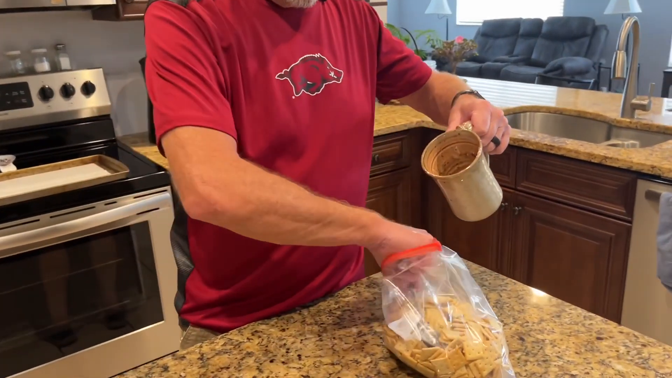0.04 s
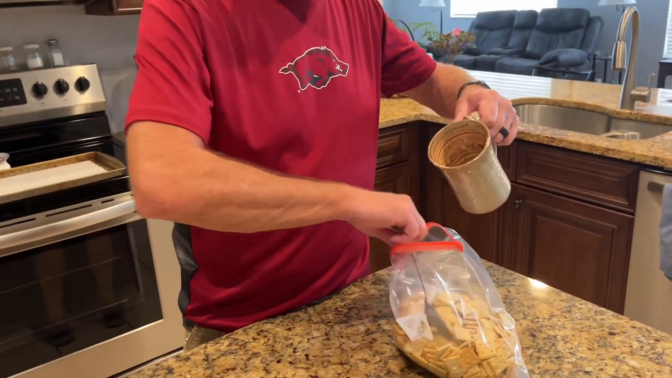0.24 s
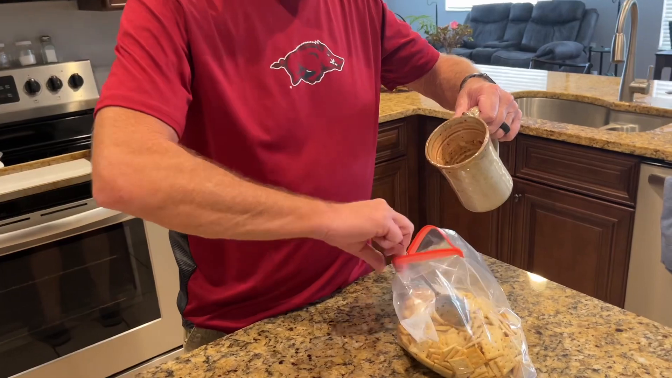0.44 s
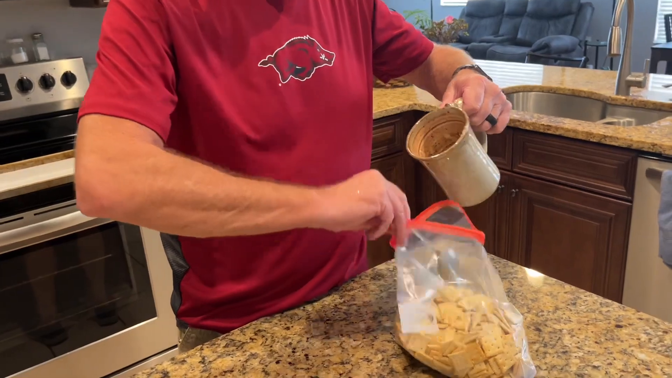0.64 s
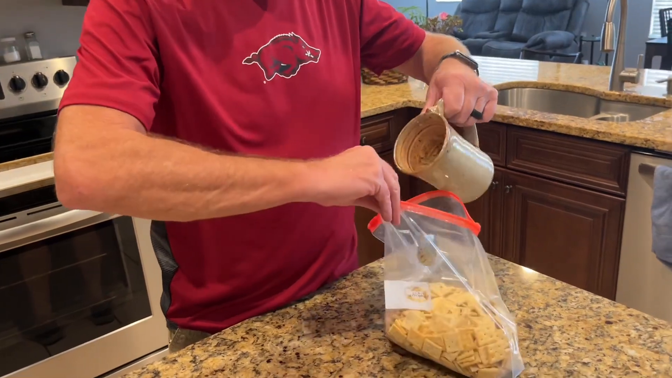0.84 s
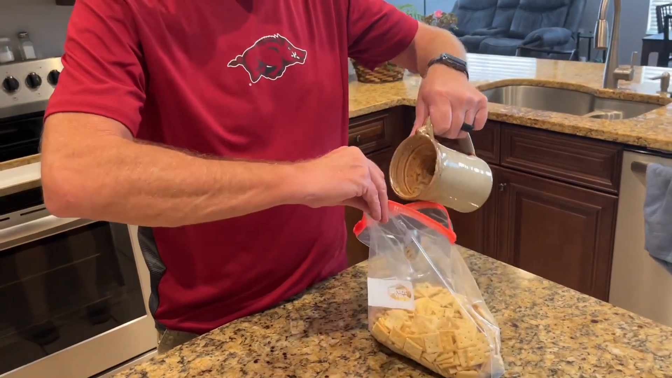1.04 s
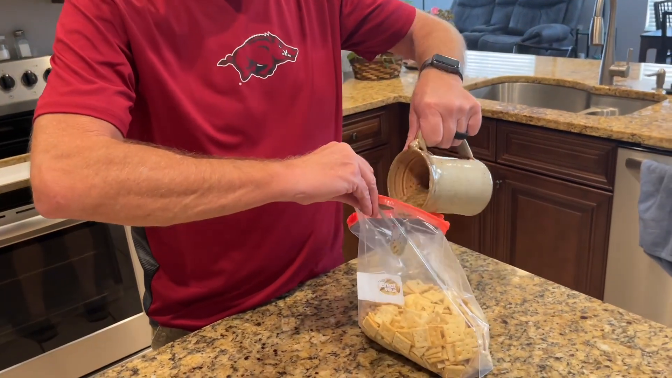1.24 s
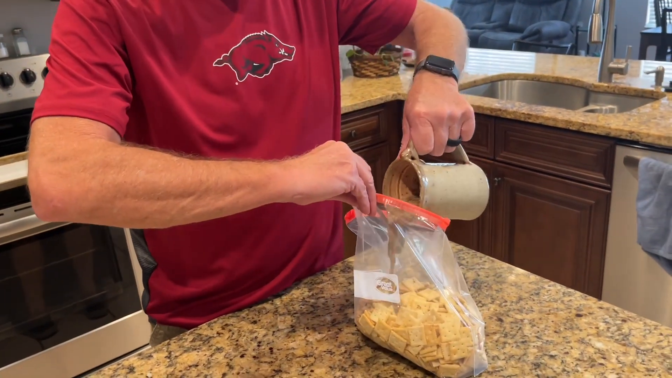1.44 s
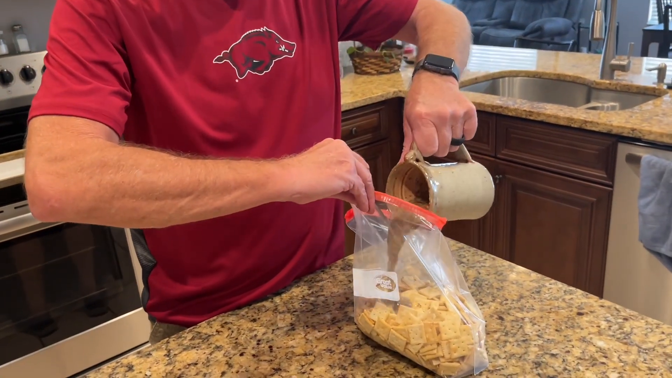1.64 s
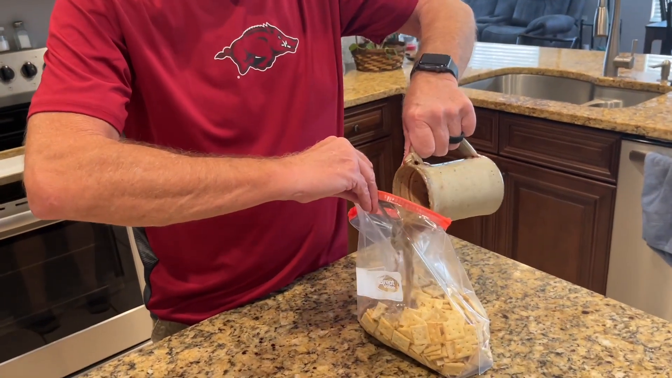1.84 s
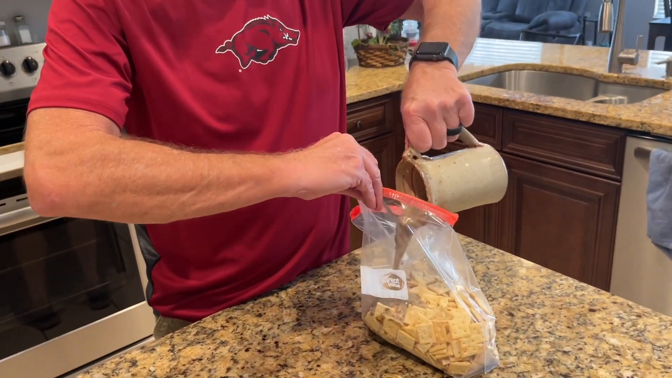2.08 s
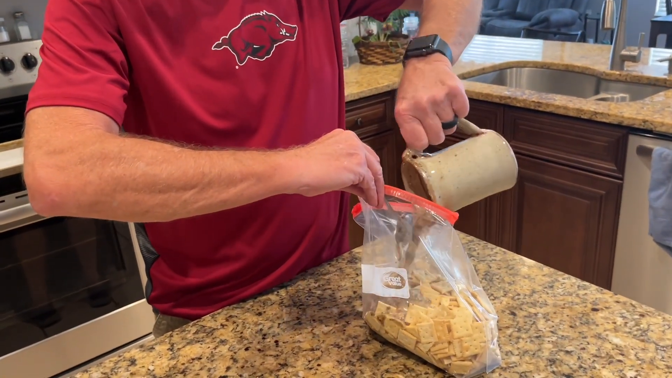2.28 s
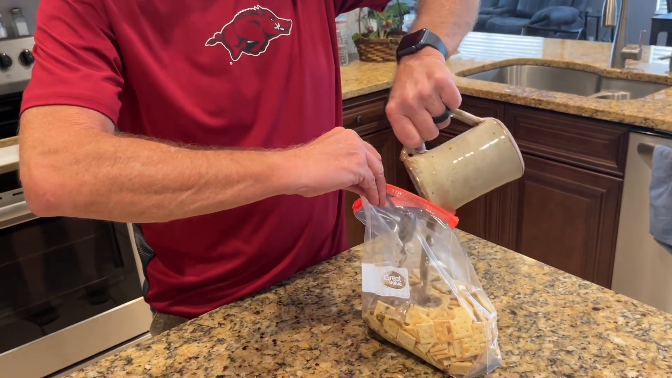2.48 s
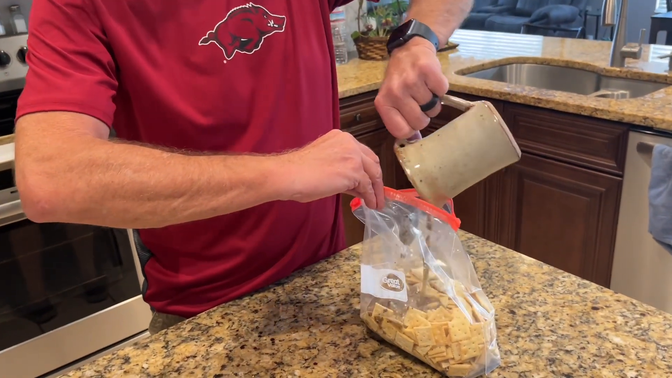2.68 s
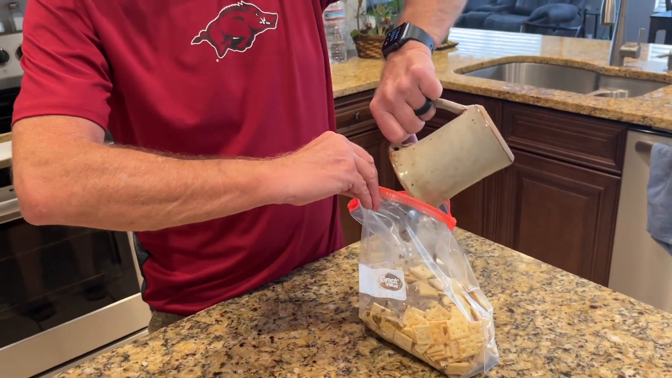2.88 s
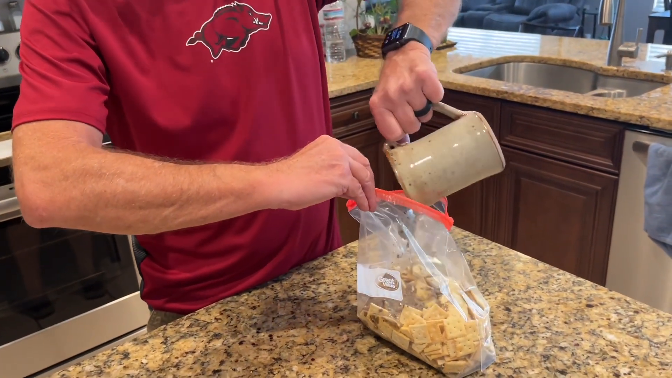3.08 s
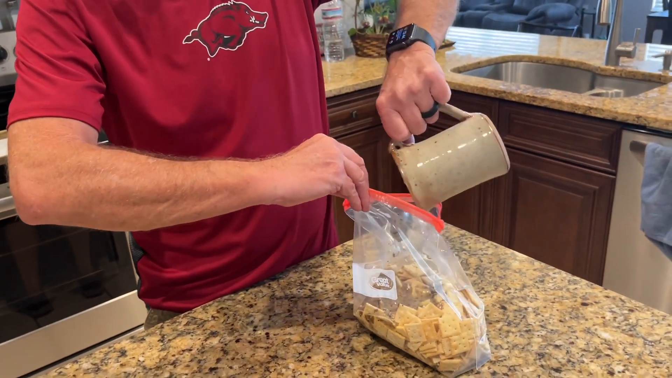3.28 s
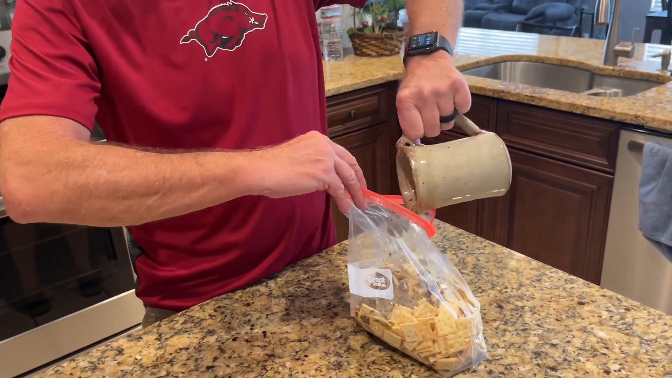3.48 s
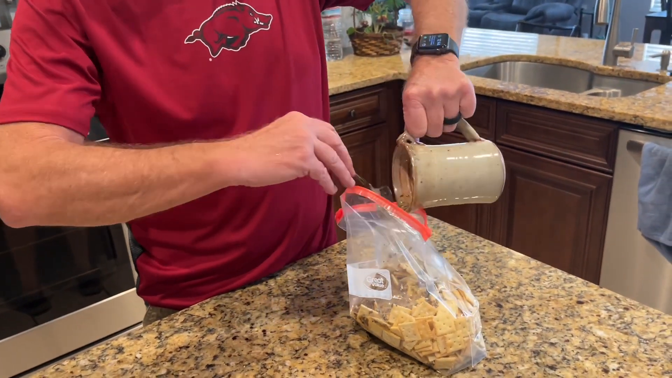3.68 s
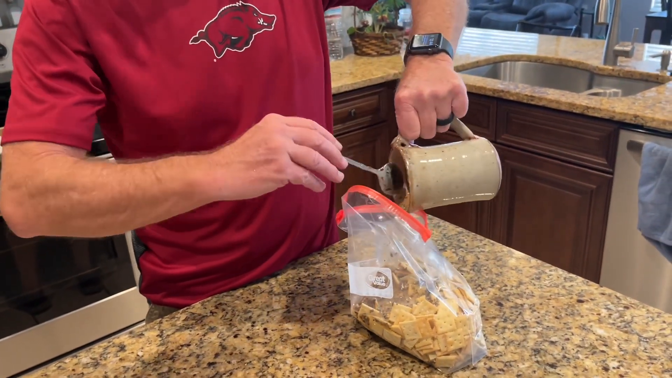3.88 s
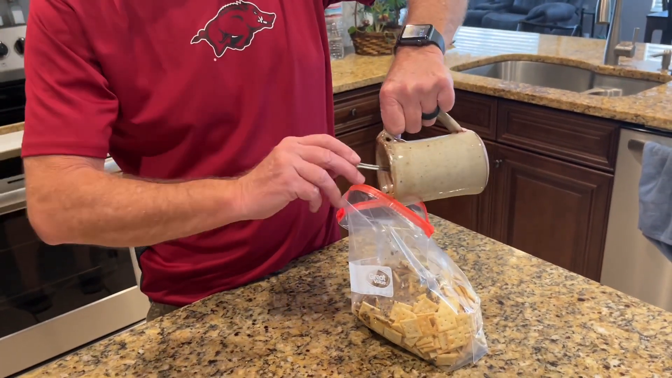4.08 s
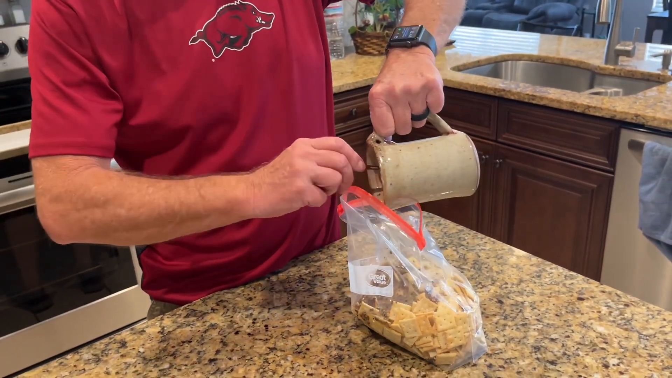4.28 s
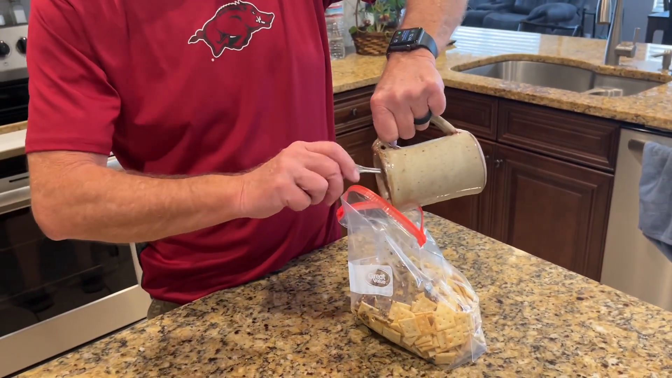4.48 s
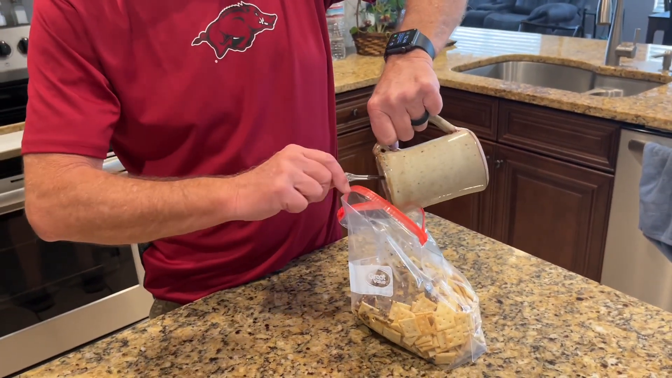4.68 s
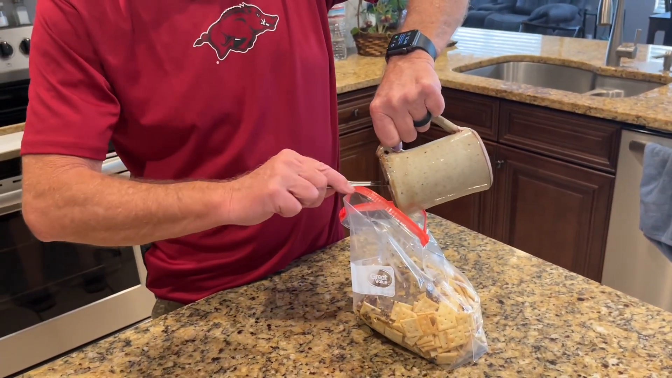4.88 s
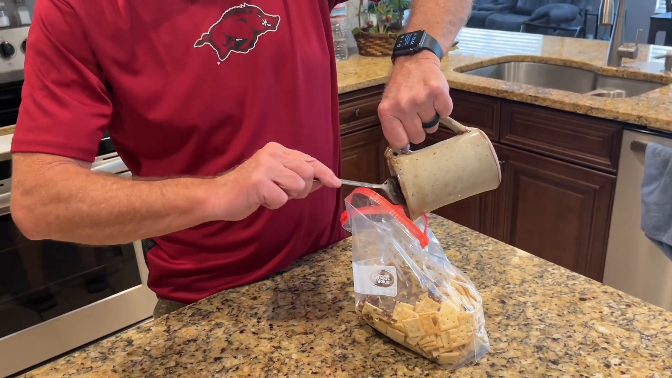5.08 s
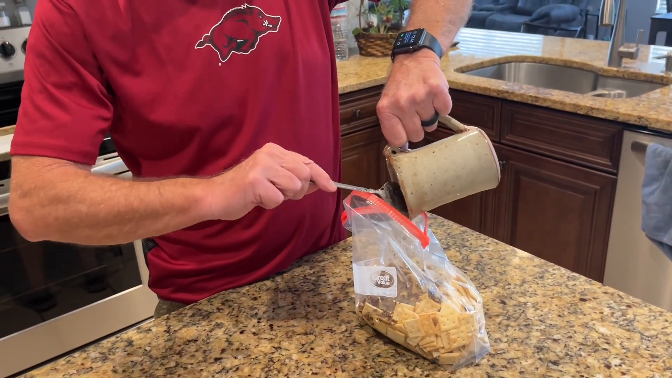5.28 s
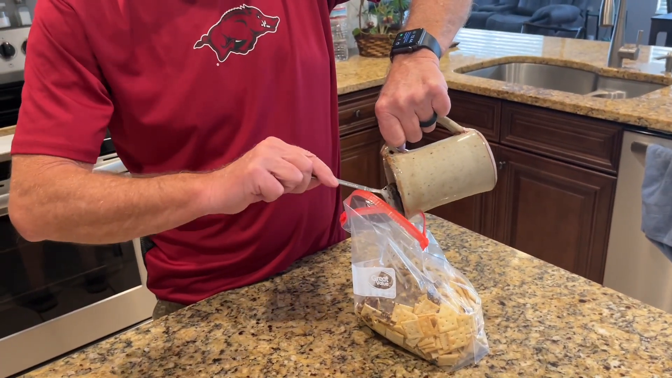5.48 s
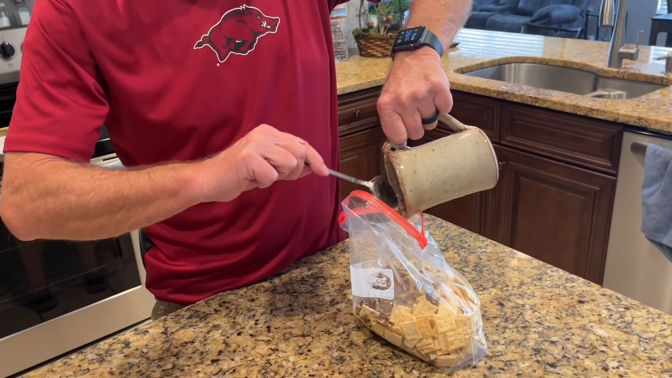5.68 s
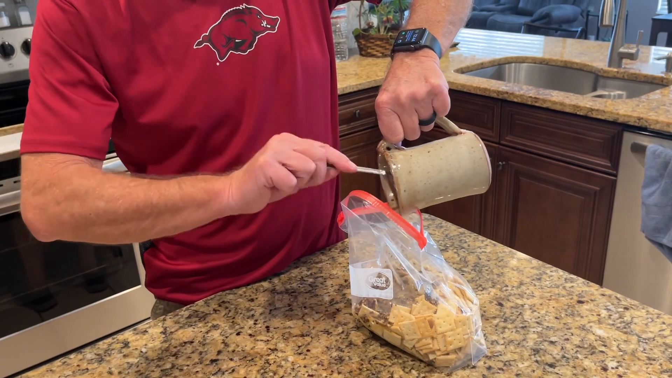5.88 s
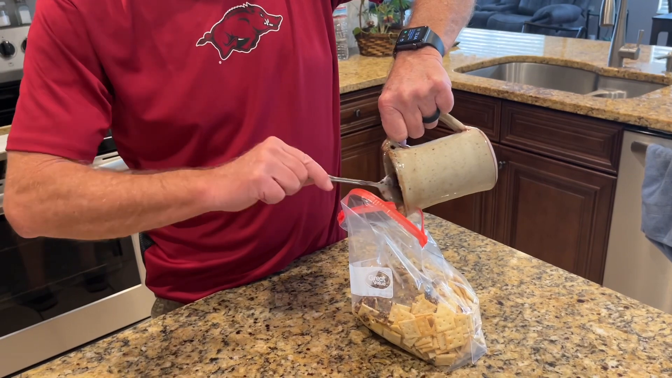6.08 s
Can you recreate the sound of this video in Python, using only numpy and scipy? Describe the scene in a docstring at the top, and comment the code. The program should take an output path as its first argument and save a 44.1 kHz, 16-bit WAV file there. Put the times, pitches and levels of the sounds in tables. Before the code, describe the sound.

A nearby stereo microphone catches thin plastic film rustling and chips shifting, strongest in the first second, then only faint crackles and isolated snaps. After a lull the spoon comes in: bright, short clinks against a ceramic mug, gritty stick-slip scrapes, spaced taps and a last cluster of lighter scraping. The kitchen adds a slight fading echo over low motor hum and soft rumble.

```python
"""A metal spoon knocks and scrapes inside a stoneware mug: bursts of noise and short rings make the knocks,
and trains of tiny clicks through gliding resonances make the scrapes.
Before and around it a plastic bag of chips, lifted open as the mug is tipped over it, crinkles: shaped clicks and snaps.
The hand and the food damp each clink, and the kitchen rings on as fading echoes.
An appliance hums throughout as wavering tones over quiet air noise, with a soft low rumble."""
import sys
import numpy as np
from scipy import signal
from scipy.fft import rfft, irfft, next_fast_len
from scipy.io import wavfile

SR = 44100
rng = np.random.default_rng(int(sys.argv[2]) if len(sys.argv) > 2 else 0)


def dump(signal):
    """Clip the signal to [-1, 1] and save it as 16-bit WAV at the path in sys.argv[1]."""
    limited = np.clip(np.atleast_2d(signal).T, -1, 1)
    pcm = np.round(limited * 32767).astype(np.int16)
    wavfile.write(sys.argv[1], SR, pcm)


N = 270538
TIME = np.arange(N) / SR

# edges of the frequency bands of a spoon touch: (edge [Hz])
TOUCH_EDGES = [350, 1350, 2200, 4000, 8000, 14000]
# how alike left and right are in the air noise and the echoes: (frequency [Hz], likeness [-1 to 1])
ROOM_LIKENESS = [(60, 0.8), (140, 0.9), (300, 0.67), (640, 0.039), (1400, -0.18), (3100, 0.39),
                 (7000, -0.059)]
# neither side leads: (frequency [Hz], lead of the left [rad])
NO_LEAD = [(100, 0), (10000, 0)]


def amp(db):
    """Turns decibels into a plain factor."""
    return 10 ** (np.asarray(db) / 20)


def evened(x):
    """Scales a sound to an average (rms) strength of 1."""
    return x / np.sqrt(np.mean(x ** 2) + 1e-20)


def unit(x):
    """Scales a sound to a total energy of 1."""
    return x / np.sqrt(np.sum(x ** 2) + 1e-20)


def read(points, hz):
    """Reads a curve of (frequency, value) points, with straight lines on a logarithmic frequency scale."""
    f, value = np.transpose(points)
    return np.interp(np.log(hz + 1), np.log(np.maximum(f, 1)), value)


def add(mix, s, sound):
    """Adds a sound to the mix, starting at s seconds."""
    part = mix[..., max(round(s * SR), 0):][..., :sound.shape[-1]]
    part += sound[..., :part.shape[-1]]


def colour(x, points, size=4096):
    """Filters a pair of sounds to a (Hz, dB) curve, without any sound ahead of its cause."""
    log_gain = np.log(amp(read(points, abs(np.fft.fftfreq(size, 1 / SR)))))
    # minimum phase: the filter answers as early as it can
    taps = np.fft.ifft(np.exp(np.conj(signal.hilbert(log_gain)))).real
    return signal.fftconvolve(x, taps[None, :size // 2], axes=1)[:, :x.shape[1]]


def drift(hz):
    """A slow random wander of rms 1; a higher hz wanders faster."""
    size = next_fast_len(N, True)
    spectrum = rfft(rng.standard_normal(size))
    smoothing = np.exp(-(np.fft.rfftfreq(size, 1 / SR) / hz) ** 2)
    return evened(irfft(spectrum * smoothing, size)[:N])


def swell(middle_s, length_s):
    """A smooth rise and fall of height 1."""
    return np.exp(-(2 * (TIME - middle_s) / length_s) ** 2)


def ring(hz, t60, t, wave=np.sin):
    """One dying tone of energy 1 that falls by 60 dB in t60 seconds."""
    return unit(wave(2 * np.pi * hz * t) * np.exp(-np.log(1000) * t / max(t60, 1e-3)))


def grains(per_s, spread_db):
    """Two trains of tiny clicks at the same random moments, of very uneven size."""
    happens = rng.random(N) < per_s / SR
    size = amp(spread_db * np.minimum(rng.exponential(1, N), 4)) * happens
    return evened(size * rng.standard_normal((2, N)))


def tilted(colour_db, brightness_db):
    """Tilts band levels about the second highest band."""
    return np.array(colour_db) + brightness_db * (np.arange(len(colour_db)) - len(colour_db) + 2)


def voiced(x, edges, levels_db):
    """Shares the energy of a blow out among bands; each level is as if spread over a hundredth of a second."""
    out = 0
    for band, db in zip(zip(edges, edges[1:]), levels_db):
        part = signal.sosfilt(signal.butter(3, band, "bandpass", fs=SR, output="sos"), x)
        out = out + amp(db) * evened(part) * np.sqrt(SR / 100 / len(x))
    return out


def resonate(x, hz, width_hz, steady=0):
    """A resonance along the curve hz, applied twice for steep sides; steady (0-1) evens out its swing."""
    turn = np.exp(2j * np.pi * np.cumsum(hz) / SR)
    pole = np.exp(-np.pi * width_hz / SR)
    swing = signal.lfilter([1], np.poly([pole, pole]), x / turn)
    size = abs(swing) + np.mean(abs(swing)) / 2 + 1e-20
    return evened((turn * swing / size ** steady).real)


def ports(pair, likeness, phase):
    """Mixes two unrelated versions of a sound into a partly alike left and right microphone port."""
    hz, (a, b) = np.fft.rfftfreq(N, 1 / SR), rfft(pair)
    same = np.clip(read(likeness, hz), -1, 1)
    common = a * np.sqrt((1 + same) / 2)
    apart = b * np.sqrt((1 - same) / 2)
    turn = np.exp(.5j * read(phase, hz))
    return irfft(np.array([(common + apart) * turn, (common - apart) / turn]), N)


def background(air_db=-60.5):
    """Steady air noise and the wavering tones of a motor."""
    # colour of the air noise: (frequency [Hz], relative level [dB])
    air_colour = [(25, -30), (130, -14.5), (185, -6.5), (309, -6), (363, -6.5), (714, -14), (6740, -39),
                  (7920, -44), (9320, -28.5), (12200, -30.5), (16000, -32)]
    # appliance hum and two faint whines: (frequency [Hz], level [dB], unsteadiness [ratio])
    hum_tones = [(184.2, -68, 0.73), (362.5, -62.5, 1), (456.6, -68, 0.17), (833, -77.5, 0.42),
                 (943, -77.5, 0.39), (3650, -84, 0.73), (5200, -88, 0.65)]
    sound = amp(air_db) * evened(colour(rng.standard_normal((2, N)), air_colour))
    for hz, db, unsteady in hum_tones:
        waver = 1 + unsteady * (drift(hz=5.6) + 1j * drift(hz=20.5)) / np.sqrt(2)
        sound[0] += amp(db) * evened((waver * np.exp(2j * np.pi * hz * TIME)).real)
    return ports(sound, ROOM_LIKENESS, NO_LEAD)


def rumble(low_hz=50, high_hz=125, level_db=-72, lull_db=-23, lull_at_s=4.6, lull_s=1.12):
    """Soft low noise that sinks once for about a second."""
    noise = signal.sosfilt(signal.butter(3, [low_hz, high_hz], "bandpass", fs=SR, output="sos"),
                           rng.standard_normal(N))
    return evened(noise) * amp(level_db + lull_db * swell(lull_at_s, lull_s))


def chips(rise_s=0.032, fall_s=0.022):
    """Chips tumble against each other while the bag drags on the counter; each lurch builds and dies quickly."""
    # colour of the tumbling: (frequency [Hz], relative level [dB])
    chip_colour = [(30, -6), (70, 5), (150, -1), (350, 10.5), (600, -7), (1100, -1), (2000, -3.5),
                   (5000, -45)]
    # the chips lurch as the bag is lifted and settles: (time [s], level [dB])
    lurches = [(.625, -62), (0.687, -47), (.75, -54.5), (1.009, -58.5), (1.08, -75)]
    tumble = evened(colour(grains(per_s=980, spread_db=2.0), chip_colour))
    strength = 0
    for s, db in lurches:
        strength = strength + amp(db) * np.exp(-np.maximum((s - TIME) / rise_s, (TIME - s) / fall_s))
    return tumble * strength


def rustle(body_db=5, fizz_db=-6, fizz_follow=0.85, ticks_per_s=50, ticks_db=-11):
    """Countless tiny crinkles of the film, in clumps, and stray ticks; all swell with each shift of the grip."""
    # body of the crinkle: (frequency [Hz], relative level [dB])
    film_colour = [(300, 4), (800, 3), (1500, 0), (3000, 1), (5000, 1), (7500, -2), (10000, -23),
                   (16000, -25)]
    # its treble fizz: (frequency [Hz], relative level [dB])
    fizz_colour = [(2000, -47), (6000, -24), (10000, 3), (13000, 2.5), (16000, -12)]
    # the fingers shift their grip on the film: (middle [s], length [s], relative level [dB])
    grips = [(0.264, 0.2, -64), (0.442, 0.034, -60), (0.624, 0.04, -52.5), (0.688, 0.062, -48),
             (0.741, 0.034, -50.5), (1.07, 0.14, -69.5), (1.796, 0.72, -74), (2.586, 0.85, -76),
             (3.558, 0.52, -76.5)]
    # the held bag rustles less and less until the hand lets go
    first_db, later_db, settle_s, let_go_s = -67, -76.5, 0.73, 4.4
    held = amp(later_db + (first_db - later_db) * np.exp(-(TIME / settle_s) ** 2)) * (TIME < let_go_s)
    shifts = sum((amp(db) * swell(s, length)) ** 2 for s, length, db in grips)
    handling = np.sqrt(held ** 2 + shifts)
    clumps = amp(2.5 * drift(hz=90))
    crinkles = grains(per_s=2200, spread_db=2.2) * clumps
    crinkles += amp(ticks_db) * grains(ticks_per_s, spread_db=1.0)
    low = evened(colour(crinkles, film_colour)) * amp(body_db) * handling
    high = evened(colour(crinkles, fizz_colour)) * amp(fizz_db) * handling ** fizz_follow
    return low + high


def nudges():
    """The spoon nudges the chips deep in the bag: a dull tick with two short resonances, muffled by the chips."""
    # the nudges: (time [s], level [dB])
    touches = [(2.0872, -56.5), (2.983, -59), (3.058, -57)]
    # their two resonances: (frequency [Hz], time to fall by 60 dB [s])
    modes = [(1220, .005), (2800, 0.0025)]
    out, t = np.zeros((2, N)), np.arange(SR // 20) / SR
    for s, db in touches:
        tick = sum(ring(hz, t60, t) for hz, t60 in modes)
        add(out[0], s, voiced(tick, [min(TOUCH_EDGES), max(TOUCH_EDGES)], [db]))
    return out


def snaps(level_db=4, snap_s=.0021, flutter_db=-17, flutter_s=.01):
    """A crease pops over in a couple of milliseconds and the film flutters briefly after it."""
    # creases of the bag snapping over: (time [s], relative level [dB], brightness [dB per band])
    creases = [(0.0841, -56, 0.5), (.212, -65, 0), (0.4231, -53.5, 4.5), (.449, -55.5, 15),
               (0.453, -51.5, 2), (0.521, -61, 0.5), (0.5811, -54.5, 2), (0.598, -53, 3.5),
               (0.61, -57, 4.5), (0.6226, -44.5, 3.5), (0.636, -52, 0), (0.6926, -45, 11),
               (0.698, -55.5, -4.5), (.7472, -56, 1.5), (0.996, -62, 1), (1.015, -58, 0.5), (1.042, -52, 3),
               (1.258, -52, 5), (1.385, -58.5, 2), (1.5778, -65, -1), (2.531, -58, 4.5),
               (2.611, -59.5, -1.5), (3.42, -52.5, 3), (3.456, -59.5, 2.5), (3.47, -61, 15.5),
               (3.6223, -48.5, 9), (3.6504, -58.5, 1), (3.673, -60.5, 1), (3.699, -57.5, 5),
               (3.825, -67.5, -3.5), (3.862, -53, 6), (4.192, -59.5, 3)]
    # edges of the bands of a snap: (edge [Hz])
    edges = [900, 2200, 4000, 8000, 15000]
    # usual balance of those bands: (relative level [dB])
    balance_db = [-6.5, -2.5, -3, -6]
    out, t = np.zeros((2, N)), np.arange(SR // 20) / SR
    shape = np.exp(-(t / snap_s) ** 2) + amp(flutter_db) * np.exp(-t / flutter_s)
    for s, db, brightness_db in creases:
        levels_db = db + tilted(balance_db, brightness_db)
        for version in out:
            add(version, s, voiced(shape * rng.standard_normal(len(t)), edges, levels_db))
    return amp(level_db) * out


def scrapes(level_db=3, grit_db=-9, squeal_width_hz=260, swell_db=15, catch_db=2.5):
    """The spoon's edge sticks and slips on the glaze; the slips ring the wall and one squeal, and both glide."""
    # strokes along the wall: (start [s], length [s], relative level [dB], squeal [Hz],
    # squeal against the rasp [dB], rise of pitch [share], brightness [dB per octave])
    strokes = [(4.221, 0.12, -53, 2650, 1, 0.079, 4), (4.335, 0.042, -49.5, 2815, 9, 0.019, 17),
               (4.309, 0.11, -50.5, 3690, 2, -0.023, 4), (4.514, 0.024, -47, 3215, 16, 0.0023, -2),
               (4.549, 0.047, -43, 4830, -2, .12, 8.5), (4.596, 0.024, -53, 5000, 8, -.01, -3),
               (4.574, 0.087, -54.5, 1820, 3, 0.0093, -2), (4.668, .073, -57, 2870, -11.5, -.018, 3),
               (4.86, 0.045, -61.5, 1660, -5, -0.016, 6), (4.916, 0.037, -55.5, 2880, 5, 0, -9),
               (4.936, 0.049, -53.5, 4670, -10, -0.0046, 6), (4.955, 0.1, -51.5, 2520, -6, -0.027, 4.5),
               (5.218, 0.084, -52.5, 6050, -17, -.04, -2), (5.505, 0.063, -42, 4250, 0.5, .062, 4),
               (5.878, 0.19, -61, 3620, -6.5, 0.019, 16), (5.95, 0.035, -56, 6120, 8, .013, 3),
               (5.987, 0.067, -49.5, 1824, 2, 0.059, 4), (6.027, 0.019, -49.5, 4130, 5, .02, 14),
               (6.039, 0.048, -49, 3450, -2, -0.045, 4), (6.015, 0.11, -57.5, 1950, 13, 0.022, 7),
               (6.047, 0.098, -53.5, 4830, 1, 0.097, 4)]
    # mug with the spoon pressed against its wall: (frequency [Hz], relative level [dB])
    wall_modes = [(1690, 1.5), (1870, 5.5), (2520, -0.5), (2870, -2), (3530, -2), (3810, 0), (4130, -5),
                  (4690, -3), (5010, -6), (5540, -9.5), (5940, -4.5)]
    # colour of the gritty part: (frequency [Hz], relative level [dB])
    grit_colour = [(300, -50), (1200, 12), (2000, -19), (5000, 0), (7000, 11), (11000, 11), (15000, -7)]
    wall_width_hz, pivot_hz = 187, 3200  # width of each resonance pass; pivot of the brightness
    wall_follow = 0.38  # share of the squeal's glide that the wall follows
    press_share = 0.46  # part of a stroke over which the pressure builds
    out = np.zeros((2, N))
    slips = grains(per_s=650, spread_db=3.2)
    grit, catches_db = colour(slips, grit_colour), catch_db * drift(hz=70)
    for start, length, db, hz, squeal_db, glide, brightness_db in strokes:
        during = (TIME >= start) & (TIME < start + length)
        progress = (TIME[during] - start) / length
        lightness = np.interp(progress, [0, press_share, 1], [1, 0, 1])
        pressure_db = catches_db[during] - swell_db * lightness ** 2
        drive, bend = slips[:, during], glide * (progress - press_share)
        wall = 0
        for mode_hz, mode_db in wall_modes:
            gain = amp(mode_db + brightness_db * np.log2(mode_hz / pivot_hz))
            wall = wall + gain * resonate(drive, mode_hz * (1 + wall_follow * bend), wall_width_hz)
        rasp = evened(evened(wall) + amp(grit_db) * evened(grit[:, during]))
        # the stronger the squeal, the narrower it is: it feeds itself and the slips turn more regular
        squeal = resonate(drive, hz * (1 + bend), squeal_width_hz / amp(squeal_db), steady=1.0)
        out[:, during] += amp(db + pressure_db + level_db) * evened(rasp + amp(squeal_db) * squeal)
    return out


def mug_ring(t, t60=0.031, linger_db=-33, linger_t60=.15, shift=.025):
    """The mug's answer to a touch: spot and grip shift each tone a little; it drops at once, then lingers faintly."""
    # mug and spoon, damped by the hand: (frequency [Hz] before the shift, relative level [dB])
    modes = [(700, 2), (1130, 0.5), (1600, 8), (1880, -5), (2820, -12.5), (3040, -4), (3330, -1),
             (3590, -5), (4060, 0.5), (4430, 0), (4970, 3), (5560, 4.5), (5900, -3), (6450, 5.5),
             (6950, -3.5), (7480, 2), (8880, -4), (9950, 4), (12260, 5)]
    out = 0
    for hz, db in modes:
        sign = rng.choice([-1, 1])
        shifted_hz = hz * (1 + shift * rng.uniform(-0.98, 1))
        tone = ring(shifted_hz, t60, t, np.cos) + amp(linger_db) * ring(shifted_hz, linger_t60, t, np.cos)
        out = out + sign * amp(db) * tone
    return unit(out)


def knocks(level_db=5, crack_db=2.0, rise_s=0.00051, second_t60_share=.4):
    """Each knock is a brief burst of chatter, the mug's tones and two rings of the pressed spoon."""
    # spoon on mug: (time [s], relative level [dB], brightness [dB per band], relative thud [dB],
    # extra metallic tick in the top band [dB], contact [s], main ring of the pressed spoon [Hz],
    # main ring against the level [dB], its time to fall by 60 dB [s], second ring [Hz],
    # second ring against the level [dB])
    touches = [(1.9473, -56.5, -1.5, -63, 1, .0052, 1774, -4, 0.039, 3680, -5),
               (4.2353, -41, -1, -59, 6.5, .008, 2620, 2, 0.021, 4850, -2.5),
               (4.3274, -51.5, 5.5, -65, 0.5, 0.026, 2817, 6.5, 0.036, 3560, -8),
               (4.457, -35, 9, -47, -1.5, 0.0052, 3220, -4.5, 0.036, 6950, 0.5),
               (4.5665, -48.5, 4, -59, -2, 0.011, 1655, -3, 0.053, 4430, 3),
               (4.5803, -50, 4, -61, -2, 0.0034, 2830, 2, 0.029, 5070, 7),
               (4.592, -48.5, -3.5, -57, 7, 0.0068, 2757, 5.5, .043, 3870, 1),
               (4.9004, -42, 0, -55.5, 2.5, 0.003, 4860, 1.5, 0.019, 5820, -2),
               (5.1925, -31.5, -1.5, -51, 2, 0.0033, 1625, -7.5, 0.024, 4090, -6.5),
               (5.499, -38, -2, -63, 6.5, 0.0056, 1720, -1, 0.027, 2980, -7.5),
               (5.8495, -62.5, -3, -53, 7, .0052, 1644, 12.5, 0.023, 5580, 3),
               (5.9796, -55, -2.5, -66, 5, 0.013, 4630, -3, 0.057, 5000, -2),
               (5.9929, -59.5, -2, -71, 5, .004, 1710, 6, 0.069, 2930, 3),
               (6.0247, -50, -2, -83, -2, 0.017, 3740, -1, 0.072, 5640, 2),
               (6.0493, -58.5, -1, -80, 1, 0.016, 2920, 13, 0.052, 3420, 4)]
    # usual balance of the bands above the thud in the lowest: (relative level [dB])
    balance_db = [-10, -2.5, 1, -4]
    out, t = np.zeros((2, N)), np.arange(SR // 4) / SR
    attack = 1 - np.exp(-t / rise_s)
    for (s, db, brightness_db, thud_db, tick_db, contact,
         main_hz, main_db, main_t60, second_hz, second_db) in touches:
        *body_db, top_db = db + tilted(balance_db, brightness_db)
        levels_db = [thud_db, *body_db, top_db + tick_db]
        for version in out:
            crack = unit(rng.standard_normal(len(t)) * np.exp(-(t / contact) ** 2))
            blow = (amp(crack_db) * crack + mug_ring(t)) * attack
            add(version, s, voiced(blow, TOUCH_EDGES, levels_db))
        # the second ring dies sooner than the main one
        rings = [(main_hz, main_db, main_t60), (second_hz, second_db, second_t60_share * main_t60)]
        for hz, ring_db, t60 in rings:
            tone = ring(hz, t60, t) * attack
            # only in the common version, so it reaches both ports equally strongly
            add(out[0], s, voiced(tone, [min(TOUCH_EDGES), max(TOUCH_EDGES)], [db + ring_db]))
    return amp(level_db) * out


def kitchen(x, gap_s=0.0035, early_boost=0.6295, early_s=0.043):
    """Echoes from counters and walls, separate and strong at first, then denser; each band dies at its own speed."""
    # time the echoes take to fall by 60 dB, before the early boost: (frequency [Hz], time [s])
    room_t60 = [(150, 0.78), (800, 0.88), (2000, 0.64), (4000, 0.72), (7000, 0.77), (13000, 0.49)]
    # strength of the echoes: (frequency [Hz], relative level [dB])
    room_level = [(150, -14.5), (800, 0), (1700, -3.5), (3500, -5.5), (7000, -9.5), (13000, -9)]
    age = np.arange(SR) / SR
    per_s = 900 + 40000 * age ** 2
    taps = rng.standard_normal((2, SR)) * (rng.random((2, SR)) < per_s / SR) / np.sqrt(per_s)
    hz, t, z = signal.stft(taps, SR, nperseg=256)
    t60 = read(room_t60, hz)[:, None]
    gain = amp(read(room_level, hz))[:, None]
    decay = np.exp(-np.log(1000) * t / t60) * np.sqrt(2 * np.log(1000) / t60 / SR)
    tail = signal.istft(z / taps.std() * gain * decay, SR, nperseg=256)[1][:, :SR]
    tail *= np.clip(age / gap_s - .5, 0, 1)  # a short gap before the first echo
    tail *= 1 + early_boost * np.exp(-age / early_s)
    return signal.fftconvolve(x[None], tail, axes=1)[:, :N]


def reflections(x, shift_s=1.25):
    """Hands and mug keep moving, so the pattern of echoes passes back and forth between two."""
    turn = 2 * np.pi * TIME / shift_s
    return kitchen(x * np.cos(turn)) + kitchen(x * np.sin(turn))


def lean(pair):
    """The echoes come unequally from the two sides, mostly a little stronger from the left."""
    # (frequency [Hz], level added on the left and taken off on the right [dB])
    left_gain = [(600, 0), (1600, 0), (3000, 2.5), (6000, 1.9), (10000, -0.5)]
    tilt_db = np.outer([1, -1], read(left_gain, np.fft.rfftfreq(N, 1 / SR)))
    return irfft(rfft(pair) * amp(tilt_db), N)


def scene():
    """Spoon and bag, heard directly and through the room, over the background."""
    # direct sound at the two microphone ports: (frequency [Hz], likeness [-1 to 1])
    direct_likeness = [(100, 0.99), (1600, 1), (4000, 0.76), (5500, 0.087), (11000, 1)]
    # (frequency [Hz], lead of the left [rad])
    direct_lead = [(100, -1), (650, 1.37), (1600, -0.24), (3100, 0.3), (4100, -0.7), (5500, -1.07),
                   (8000, -2.5), (11000, -1.27)]
    bag = chips() + rustle() + nudges() + snaps()
    spoon = scrapes() + knocks()
    direct = spoon + bag
    room = ports(reflections(direct[0]), ROOM_LIKENESS, NO_LEAD)
    return ports(direct, direct_likeness, direct_lead) + lean(room) + background() + rumble()


def record(dry):
    """The deepest bass is missing, a narrow notch cuts the treble, and the sound fades out above about 14 kHz."""
    # overall tone: (frequency [Hz], gain [dB])
    response = [(30, 0.5), (7000, -5), (7600, -10.5), (8050, -24.5), (8450, -27), (8900, -14), (9600, -9),
                (14000, -12), (15200, -27)]
    high_pass = signal.butter(4, 42, "highpass", fs=SR, output="sos")
    heard = signal.sosfilt(high_pass, colour(dry, response))
    low_pass = signal.firwin(511, 16400, window=("kaiser", 9), fs=SR)
    return signal.oaconvolve(heard, low_pass[None], "same", axes=1)


dry = scene()
out = record(dry)
dump(out)
```